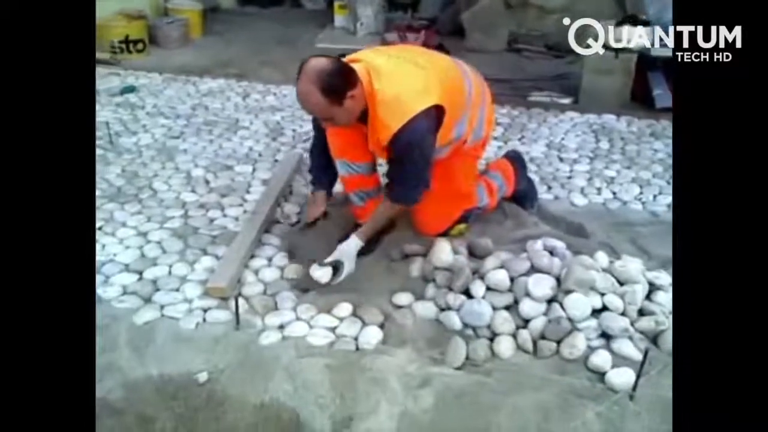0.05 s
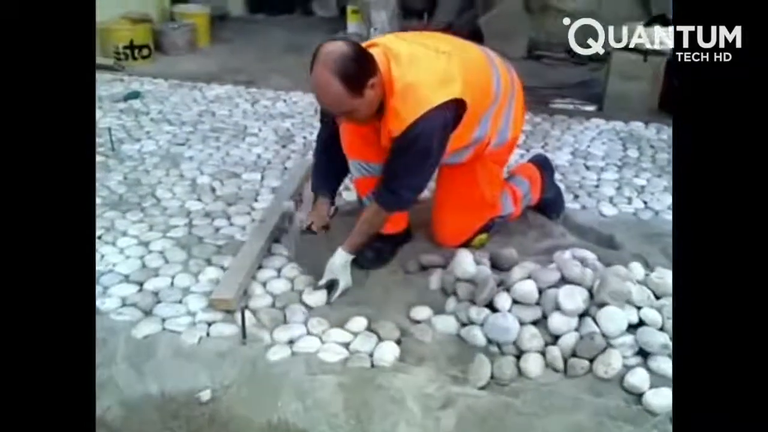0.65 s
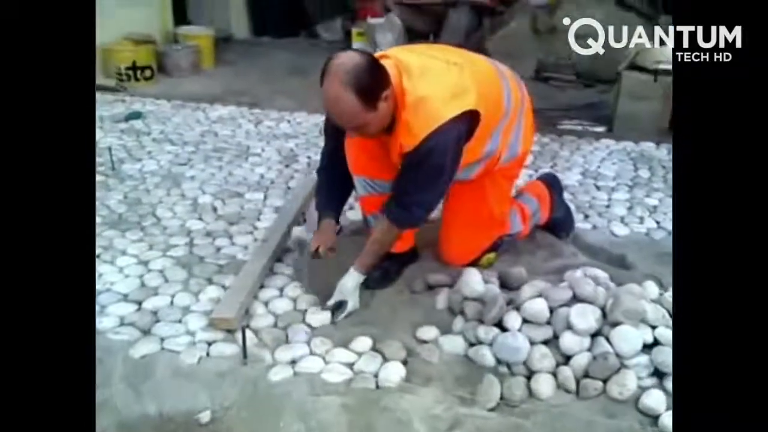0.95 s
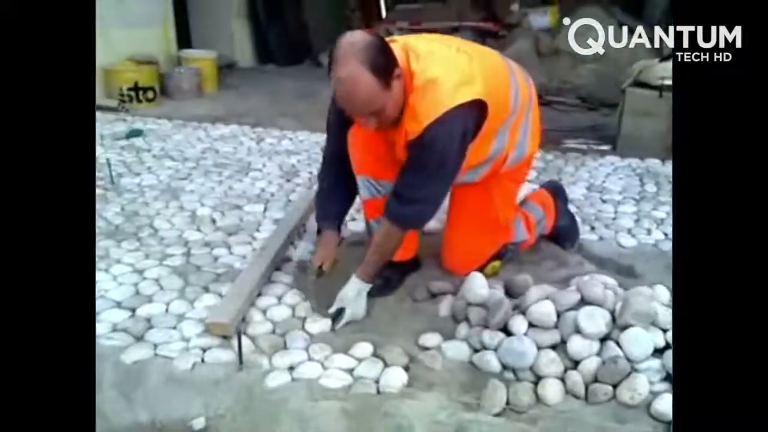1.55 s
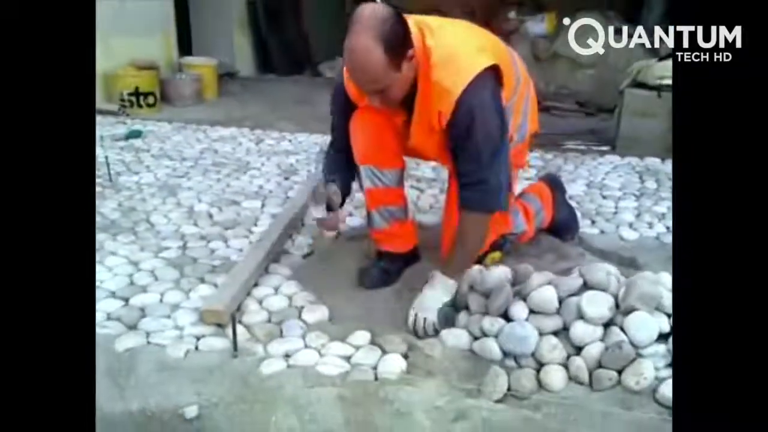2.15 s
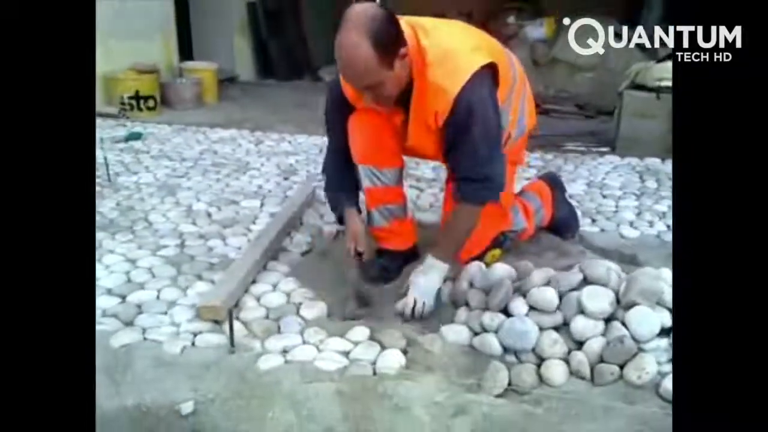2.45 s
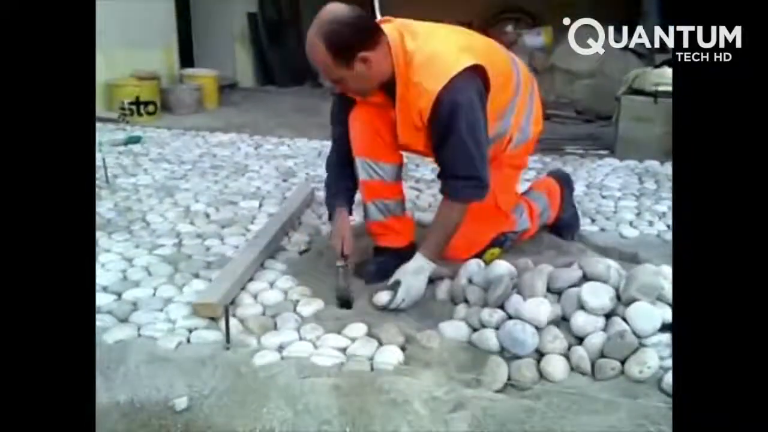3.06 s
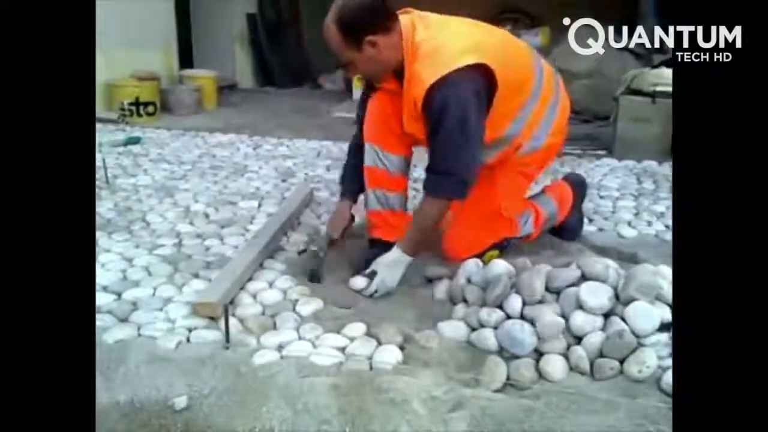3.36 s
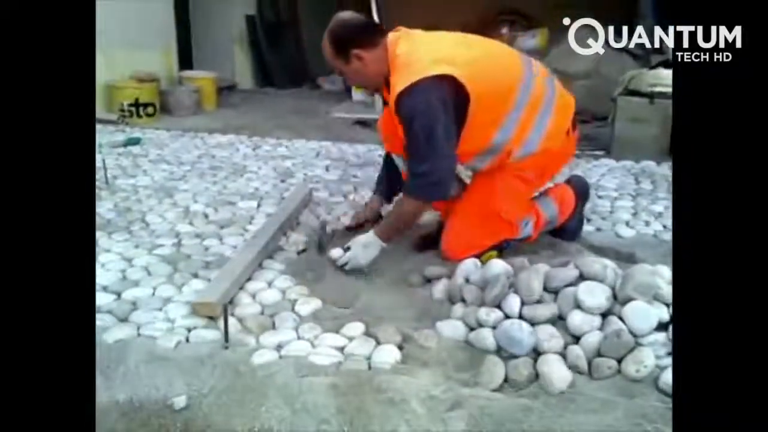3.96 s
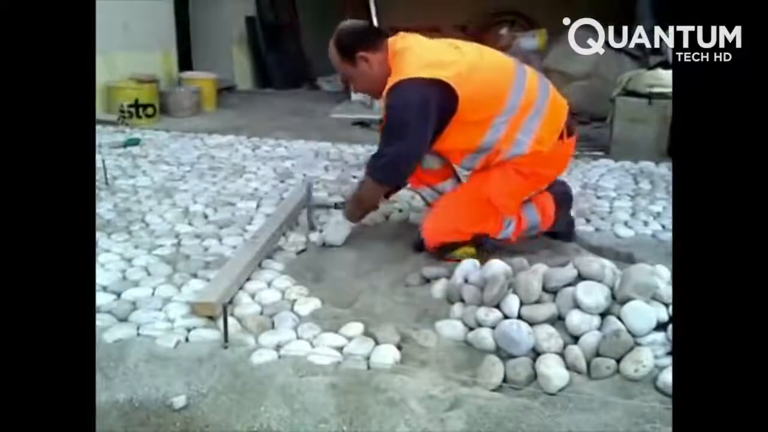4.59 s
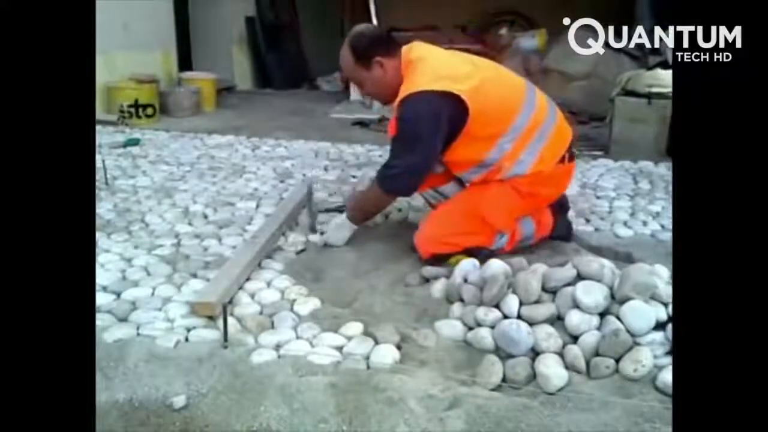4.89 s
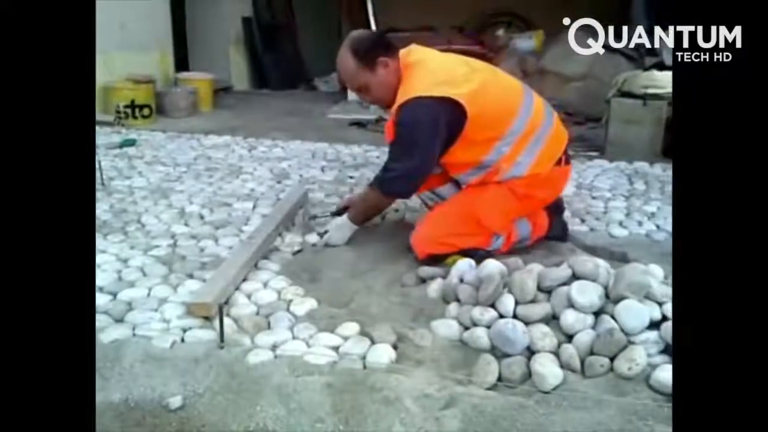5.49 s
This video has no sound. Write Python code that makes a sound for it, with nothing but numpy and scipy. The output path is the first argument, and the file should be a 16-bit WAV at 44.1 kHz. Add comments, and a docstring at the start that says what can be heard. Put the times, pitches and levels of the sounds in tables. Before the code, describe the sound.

A small hammer taps pebbles into sand with ringing knocks, while two loads of stones crash loudly into a metal barrow outdoors.

```python
"""A small steel hammer rings as a paver taps river pebbles into sand, in a walled yard.
Between the blows he picks a pebble from the pile: small clicks and scuffs of sand.
Twice a load of stones pours into a metal barrow nearby, makes its tray boom and overloads
the microphone; stragglers tumble after it. Behind it all lies a faint, distant rumble."""
import sys
import numpy as np
from scipy import signal
from scipy.fft import rfft, irfft
from scipy.io import wavfile
from scipy.ndimage import uniform_filter1d

SR = 44100
rng = np.random.default_rng(int(sys.argv[2]) if len(sys.argv) > 2 else 0)


def store_wav(level_fs):
    """Save 16-bit WAV to argv[1]."""
    pcm = np.round(np.clip(np.atleast_2d(level_fs), -1, 1) * 32767)
    wavfile.write(sys.argv[1], SR, pcm.T.astype(np.int16))


N = 248283


def hammer():
    """Each blow cracks on a pebble, beds it in sand and rings the steel; harder blows are brighter."""
    # hammer blows: t/s, force/dB, pebble pitch/Hz, pebble level/dB, steel level/dB
    blows = [(0.6887, -12, 1330, -26, -14.5), (0.6997, -19.5, 1336, -25, -12.5),
             (1.002, -6, 1120, -27, -11), (1.322, -9, 1960, -18.5, -18.5), (1.6257, -12.5, 1780, -14, -25),
             (1.8324, -18.5, 1100, -26, -26), (1.9958, -25.5, 1980, -28.5, -28),
             (4.735, -17, 1250, -22.5, -16.5), (4.7459, -19, 1250, -20, -27),
             (5.0457, -7.5, 720, -14.5, -13.5), (5.3525, -11.5, 631, -16, -22),
             (5.5951, -17, 720, -20, -3.5)]
    # tone colour of stone struck by steel: f/Hz, level/dB
    knock_spectrum = [(15, -57.5), (70, -9), (220, -3), (420, -9.5), (750, -4.5), (1250, 2.5), (1950, 1),
                      (2550, -10.5), (3600, -5.5), (4800, -5.5), (7000, -30.5), (8700, -38), (9900, -47),
                      (15000, -59.5)]
    # tone colour of the bright tick at first touch: f/Hz, level/dB
    tick_spectrum = [(15, -30.5), (3000, -6), (6000, 1), (8400, 0), (9700, -15), (15000, -23.5)]
    # ringing notes of the hammer head: f/Hz, level/dB, decay time/s
    steel_notes = [(3309, 10.5, 0.041), (3700, -2, 0.029), (3450, -13, .025), (4250, -11.5, 0.023),
                   (8450, -24.5, 0.047), (8110, -22, 0.055)]
    # his body blocks more of the direct sound as he turns to the next pebble: t/s, level/dB
    shielding = [(1.0, -0.5), (2.0, -4.5), (4.7, -10.5)]
    t, out = np.arange(SR // 2) / SR, np.zeros(N)
    for s, force_db, hz, pebble_db, steel_db in blows:
        contact = (t == 0) + 0.2 * rng.standard_normal(len(t)) * fade(t, 0.018)  # a hit, then grit
        knock = at_level(colour(contact, knock_spectrum, tilt_db=0.24 + 0.05 * force_db), force_db)
        burst = rng.standard_normal(len(t)) * fade(t, 0.01)
        tick = at_level(colour(burst, tick_spectrum), -21 + 2.1 * force_db)
        off_centre_db = force_db - steel_db  # force that misses the head's lowest note
        brightness = 7.5 + 0.56 * force_db + 0.75 * off_centre_db  # dB per octave
        damping = fade(t, 0.35 * gain_of(-1.2 * off_centre_db))  # staying on the stone deadens the head
        crack = knock + at_level(ring(t, steel_notes, brightness) * damping, steel_db)
        sand_thud = at_level(clack(t, hz=195, t60=0.023), -21 + 0.55 * force_db)
        bedding = at_level(clack(t, hz, t60=0.0082), pebble_db) + sand_thud
        shield_gain = gain_of(np.interp(s, *np.transpose(shielding)))
        add(out, s, shield_gain * near_echoes(tick + crack + bedding))
        outgoing = crack + 0.21 * bedding  # the bedded pebble sends little sound into the yard
        echo = yard(outgoing, far_s=0.048, far_hold_s=0.03, near_gain=2.74, dull_hz=3500)
        add(out, s, gain_of(-20) * echo)
    return out


def barrow():
    """Each load is a fading stream of stones; heavy ones land in and after it and set others rattling."""
    # loads poured into the barrow: start t/s, length/s, level/dB
    loads = [(0.3521, .58, -20), (3.544, 0.579, -19)]
    # heavy stones landing: t/s, clatter level/dB, decay time/s, boom level/dB
    landings = [(0.3519, -11, 0.44, -25), (0.368, -2.5, 0.21, -15), (0.388, -4.5, 0.21, -19),
                (.407, -2.5, 0.38, -5.5), (0.536, -15.5, 0.17, -22), (.601, -17, 0.77, -17),
                (.645, -16, 0.74, -20), (0.776, -21.5, 0.24, -20.5), (0.85, -23, 0.31, -26),
                (0.907, -27.5, .2, -24), (1.2037, -34.5, 0.34, -34), (1.267, -37.5, 1, -29),
                (1.462, -30, 0.19, -34.5), (3.548, -6.5, 0.27, -7), (3.571, -4, 0.42, -15),
                (3.632, -4.5, 0.29, -6), (3.706, -9, .32, -17.5), (3.755, -16, 0.42, -24),
                (3.872, -23.5, 0.26, -21.5), (3.901, -22.5, 0.26, -18.5), (3.976, -23, 0.21, -36.5),
                (4.047, -27.5, 0.23, -26), (4.125, -43.5, 0.33, -28.5), (4.565, -67.5, 0.64, -48)]
    # tone colour of stones clattering on the tray: f/Hz, level/dB
    clatter_spectrum = [(10, -59), (40, -24.5), (72, -5), (120, -20.5), (180, -5.5), (450, 0), (800, 4),
                        (1400, 2), (1950, -1.5), (2500, -10), (4500, -17.5), (6200, -33.5), (8000, -42.5),
                        (12000, -71)]
    clatter_db_per_s, boom_db_per_s = -34, -12.5  # the boom outlasts the clatter
    t, out = np.arange(SR) / SR, np.zeros(N)
    for s, length, db in loads:
        ending = fade(np.maximum(t - length, 0), 0.15)
        stream = grains(t, per_s=900) * ending
        clatter = colour(stream * gain_of(clatter_db_per_s * t), clatter_spectrum, tilt_db=-1.5)
        add(out, s, at_level(clatter, db))
        add(out, s, tray(stream * gain_of(boom_db_per_s * t), db - 8))
    for s, db, t60, boom_db in landings:
        own_crack = 0.7 * fade(t, 0.04)
        stones = grains(t, per_s=3500) * (own_crack + fade(t, t60))
        clatter = colour(stones, clatter_spectrum, tilt_db=0.5 + 0.075 * db)  # softer is duller
        add(out, s, at_level(clatter, db))
        add(out, s, tray(stones * fade(t, 0.8 * t60), boom_db))  # the first, heavier stones stir it most
    return out + gain_of(-12.5) * yard(out)


def tray(stones, boom_db, detune=0.027, lowest_hz=150):
    """The metal tray booms, more dully under soft landings; the shifting load puts it out of tune."""
    # ringing notes of the tray: f/Hz, level/dB, decay time/s
    tray_notes = [(166.7, -6, 0.23), (194.8, 0, .17), (235.4, -2.5, 0.15), (265.8, 1.5, 0.16),
                  (325.2, 3, 0.13), (362, 2.5, 0.14), (424.2, -5.5, 0.14), (523.5, -6.5, 0.17),
                  (554, -7, .16), (780, -3.5, 0.13), (840.2, -5, 0.11), (996, -13.5, 0.11),
                  (1348, -8.5, .16), (1663, -12, 0.17)]
    t = np.arange(SR // 3) / SR
    tuning = 1 + rng.uniform(-detune, detune)
    ringing = ring(t * tuning, tray_notes, tilt_db=0.1 * boom_db)
    bass_cut = signal.butter(5, lowest_hz, "high", fs=SR, output="sos")  # thin metal gives little bass
    boom = signal.fftconvolve(stones, signal.sosfilt(bass_cut, ringing))[:len(stones)]
    return at_level(boom, boom_db)


def pebbles():
    """Stone clicks on stone: a very short note over a dull knock, then two small rocks as it settles."""
    # pebbles touching: t/s, level/dB, f/Hz
    clicks = [(0.244, -64, 2100), (1.2045, -34, 866.5), (2.239, -41.5, 1123), (2.359, -53, 1700),
              (2.3629, -38, 1563), (2.5042, -53.5, 1890), (2.6988, -49.5, 1060), (2.833, -44.5, 1490),
              (2.837, -37, 1410), (2.8709, -42, 1803), (2.9438, -35, 1800), (2.9725, -51.5, 1690),
              (3.014, -52.5, 1640), (3.0636, -37, 1790), (3.21, -48, 1860), (3.431, -54.5, 450),
              (3.5346, -13, 1680), (5.269, -60, 2200)]
    # tone colour of the dull knock: f/Hz, level/dB
    knock_spectrum = [(15, -51), (200, -3), (420, -12.5), (700, -0.5), (1300, 0.5), (1950, -0.5),
                      (2500, -10), (3500, -16), (4800, -31.5), (6500, -45), (10000, -52.5)]
    t, out = np.arange(SR // 8) / SR, np.zeros(N)
    for s, db, hz in clicks:
        contact = (t == 0) + 0.35 * rng.standard_normal(len(t)) * fade(t, 0.0061)
        soft_start = 1 - 0.8 * fade(t, 0.004)
        knock = colour(contact * soft_start, knock_spectrum, tilt_db=-0.6)
        click = at_level(clack(t, hz, t60=0.007), db) + at_level(knock, db - 4.5)
        add(out, s, click)
        for delay in (0.015, 0.03):
            uneven_delay = delay * (1 + 0.48 * rng.uniform(-1, 1))
            add(out, s + uneven_delay, 0.2 * fade(delay, 0.14) * click)
    return out


def sand():
    """Shoe and glove rub the sand: many tiny grain contacts swell and die away."""
    # scuffs: peak t/s, rise and fall time/s, level/dB
    scuffs = [(0.073, 0.056, -59), (2.246, 0.049, -52.5), (2.538, .043, -42.5), (2.87, 0.083, -46.5),
              (3.211, 0.031, -46.5), (3.523, .02, -41), (4.353, .13, -59)]
    # tone colour of rubbed sand: f/Hz, level/dB
    sand_spectrum = [(15, -45.5), (100, -8.5), (600, -2.5), (1400, 1.5), (2000, 8.5), (2600, -15),
                     (4800, -11), (6500, -34), (10000, -39.5)]
    out = np.zeros(N)
    for s, length, db in scuffs:
        t = np.arange(-length, length, 1 / SR)
        rub = grains(t, per_s=2600) * np.exp(-5 * abs(t) / length)
        add(out, s - length, at_level(colour(rub, sand_spectrum), db))
    return out


def near_echoes(x):
    """The sound itself plus one quick bounce off the paving and one off the nearest wall."""
    out = x.copy()
    add(out, 0.0047, 0.19 * x)  # paving
    add(out, 0.0113, 0.17 * x)  # wall
    return out


def yard(x, far_s=0.046, far_hold_s=0.037, near_gain=2.8, dull_hz=6000, lumpy_db=3):
    """Sound scatters off the ground nearby; then duller, uneven echoes return from the far walls."""
    # how long the yard echoes: f/Hz, decay time/s
    decay_times = [(150, 0.28), (1000, 0.25), (3300, .24), (5000, 0.18), (12000, 0.12)]
    t, lump_times = np.arange(SR * 3 // 4) / SR, np.arange(0, 1, 0.005)
    echoes = rng.standard_normal(len(t))
    echoes *= gain_of(lumpy_db * np.interp(t, lump_times, rng.standard_normal(len(lump_times))))
    hz, when, bands = signal.stft(echoes, SR, nperseg=256)
    decay_rate = np.log(1000) / read(decay_times, hz)[:, None]
    near = near_gain * (when > 0.006) * np.exp(-1.4 * decay_rate * when)
    far = 0.6 * (when > far_s) * np.exp(-decay_rate * np.maximum(when - far_s - far_hold_s, 0))
    far /= np.sqrt(1 + (hz[:, None] / dull_hz) ** 2)
    tail = signal.istft(bands * (near + far), SR, nperseg=256)[1]
    return signal.fftconvolve(x, tail / np.linalg.norm(tail))[:len(x)]


def air():
    """Faint outdoor noise with a low rumble that slowly swells and sinks."""
    # tone colour of the background: f/Hz, level/dB
    air_spectrum = [(15, -43), (25, -12.5), (55, -1.5), (80, 4), (153, -8.5), (531, -21.5), (607, -19),
                    (863, -27.5), (988, -20), (1790, -22), (2690, -30), (7310, -42), (12200, -48.5),
                    (16000, -58.5)]
    # swell of the distant rumble: t/s, level/dB
    rumble_levels = [(0, 10), (0.331, 4), (2.1, -1), (2.6, -2), (2.901, 8), (3.3, 1), (4.5, -1),
                     (5.63, -4.5)]
    hz = np.fft.rfftfreq(N, 1 / SR)
    noise = irfft(rfft(rng.standard_normal(N)) * gain_of(read(air_spectrum, hz)), N)
    noise *= gain_of(-60.5) / noise.std()
    rumble = irfft(rfft(noise) / (1 + (hz / 250) ** 4), N)
    swell = gain_of(np.interp(np.arange(N) / SR, *np.transpose(rumble_levels)))
    return noise - rumble + rumble * swell


def ring(t, notes, tilt_db=0, contact_s=0.00058):
    """A struck object: its notes build up during the contact, then die; tilt_db lifts the high ones."""
    first_hz = notes[0][0]
    sines = sum(gain_of(db + tilt_db * np.log2(hz / first_hz)) * fade(t, t60) * np.sin(2 * np.pi * hz * t)
                for hz, db, t60 in notes)
    return sines * (1 - np.exp(-(t / contact_s) ** 2))


def clack(t, hz, t60):
    """A few vibrations that swell and die within milliseconds."""
    return t * fade(t, t60) * np.sin(2 * np.pi * hz * t)


def grains(t, per_s, spread_db=2.5):
    """Small contacts of uneven size at random moments."""
    size = gain_of(spread_db * np.minimum(rng.exponential(1, len(t)), 3))
    return size * rng.choice([-1, 1], len(t)) * (rng.random(len(t)) < per_s / SR)


def colour(x, spectrum, tilt_db=0, size=4096):
    """Gives a sound this tone colour, made brighter by tilt_db per octave."""
    hz = np.abs(np.fft.fftfreq(size, 1 / SR))
    octaves = np.log2(np.clip(hz, 400, 9000) / 1500)
    log_gain = np.log(gain_of(read(spectrum, hz) + tilt_db * octaves))
    response = np.exp(np.conj(signal.hilbert(log_gain)))  # nothing sounds ahead of the hit
    taps = np.fft.ifft(response).real
    return signal.fftconvolve(x, taps[:size // 2])[:len(x)]


def fade(t, t60):
    """Dies away by 60 dB in the decay time, t60 seconds."""
    return np.exp(-np.log(1000) * t / max(t60, 1e-4))


def gain_of(db):
    """Turns decibels into a factor to multiply by."""
    return 10 ** (np.asarray(db) / 20)


def read(points, hz):
    """Looks up a table at any frequency, gliding between its rows on a pitch scale."""
    f, value = np.transpose(points)
    return np.interp(np.log(hz + 1), np.log(f + 1), value)


def at_level(x, db):
    """Scales a sound so that its loudest fiftieth of a second has this level."""
    power = uniform_filter1d(x ** 2, size=SR // 50, mode="constant")
    return x * gain_of(db) / np.sqrt(power.max() + 1e-20)


def add(mix, s, sound):
    """Mixes a sound in, starting at s seconds."""
    part = mix[max(round(s * SR), 0):][:len(sound)]
    part += sound[:len(part)]


def scene():
    """Everything at one microphone; the clicks and scuffs echo faintly too."""
    blows, loads, clicks, scuffs = hammer(), barrow(), pebbles(), sand()
    echo = gain_of(-19) * yard(scuffs + 0.3 * clicks)
    return (blows + loads + clicks + scuffs + echo + air())[None]


def record(dry):
    """The overloaded microphone squashes the loudest peaks flat; then the highest treble is cut."""
    squashed = 0.98 * dry / (1 + dry ** 12) ** (1 / 12)
    treble_cut = signal.firwin(201, cutoff=15600, window=("kaiser", 8), fs=SR)
    return signal.oaconvolve(squashed, treble_cut[None], "same")


dry = scene()
out = record(dry)
store_wav(out)
```